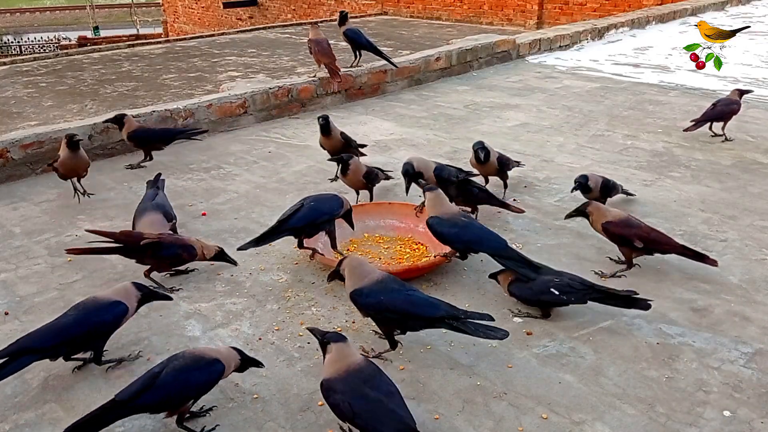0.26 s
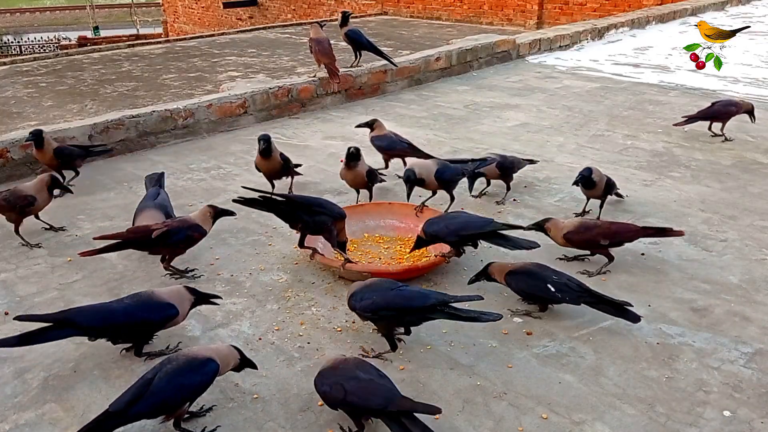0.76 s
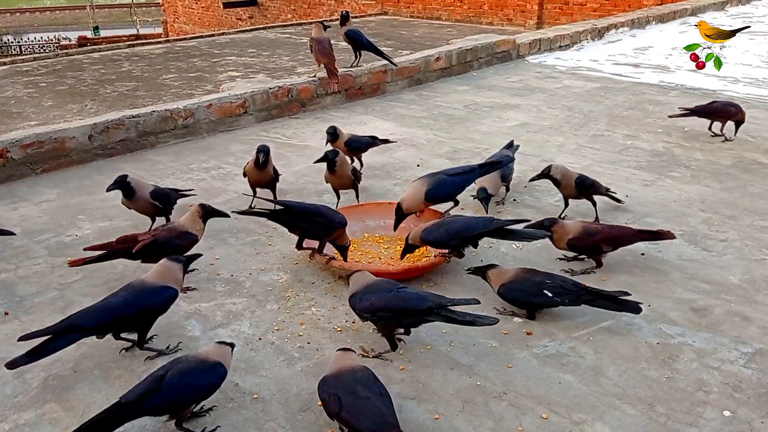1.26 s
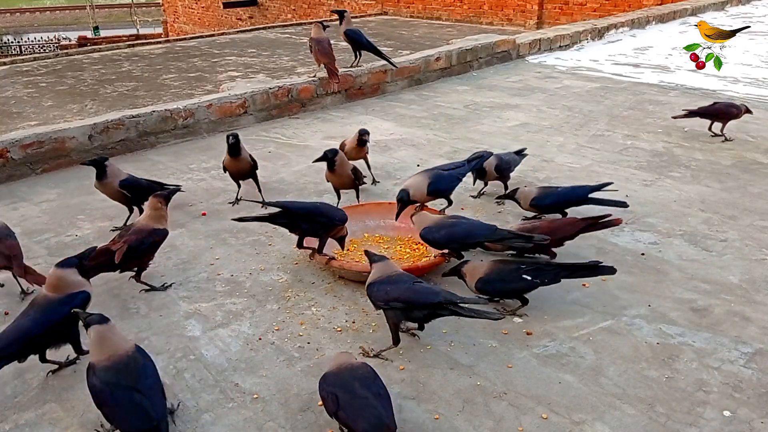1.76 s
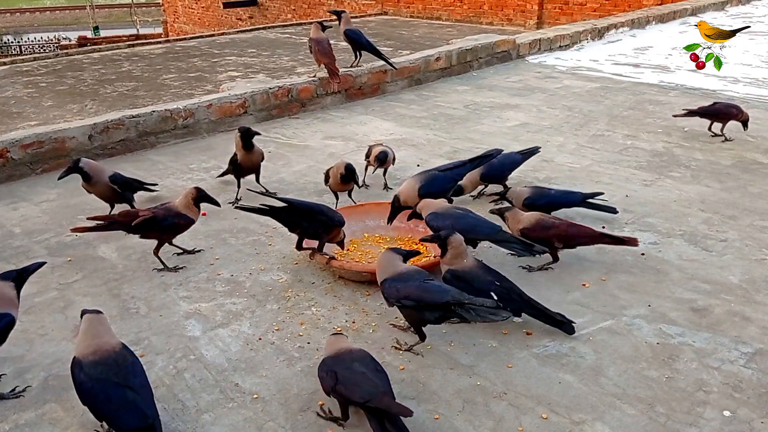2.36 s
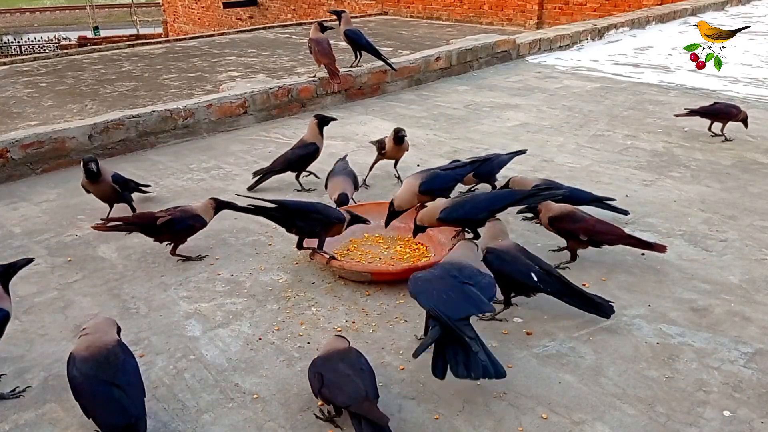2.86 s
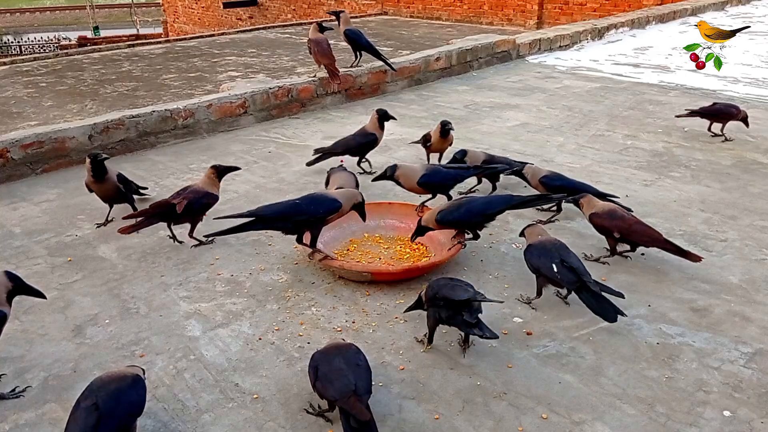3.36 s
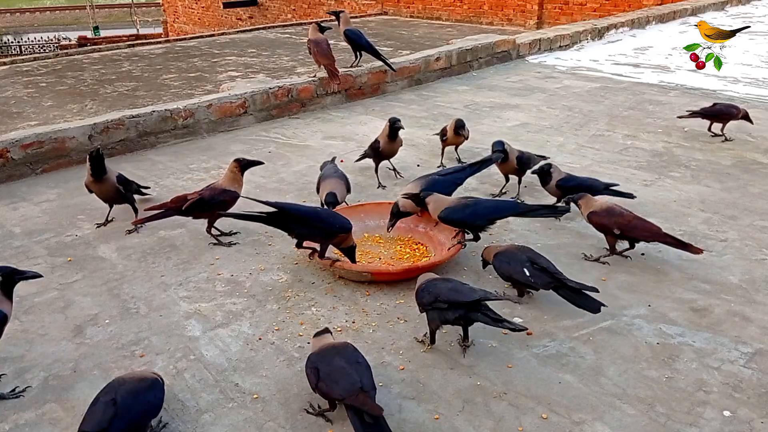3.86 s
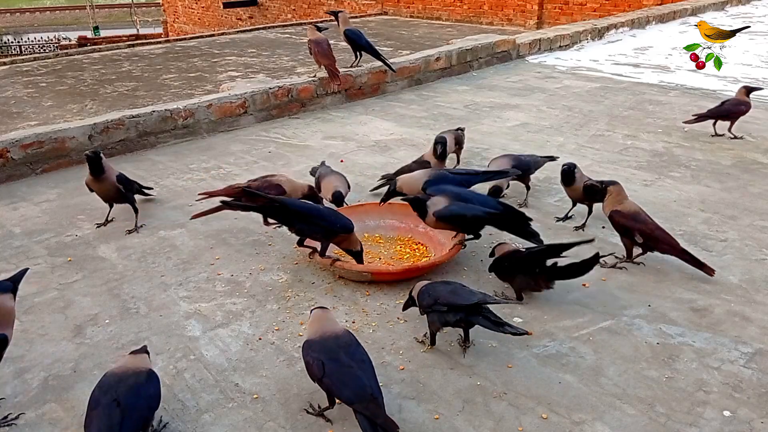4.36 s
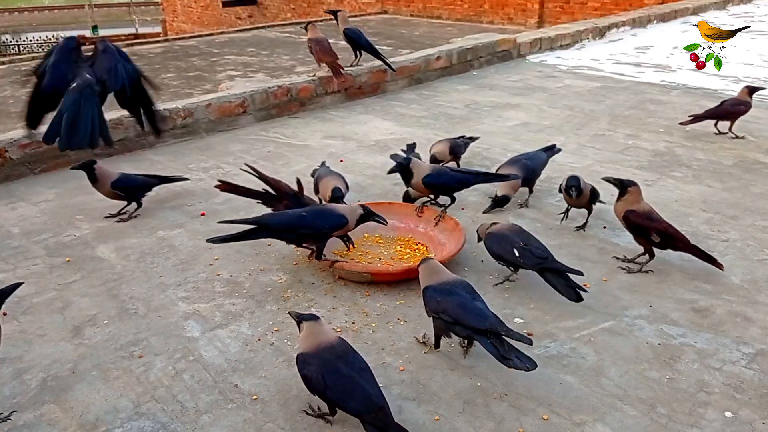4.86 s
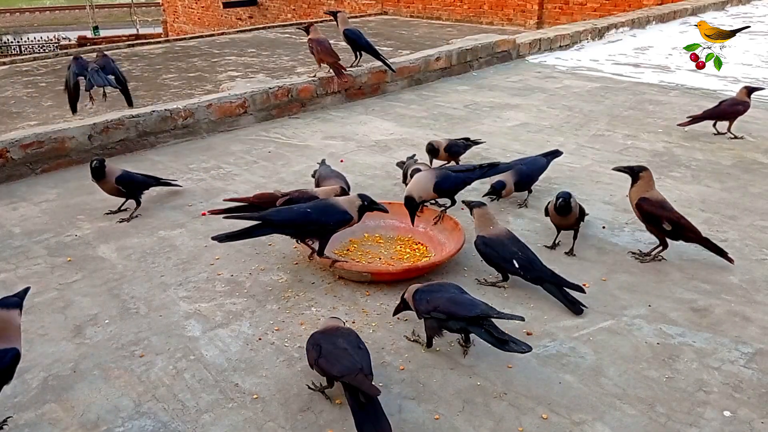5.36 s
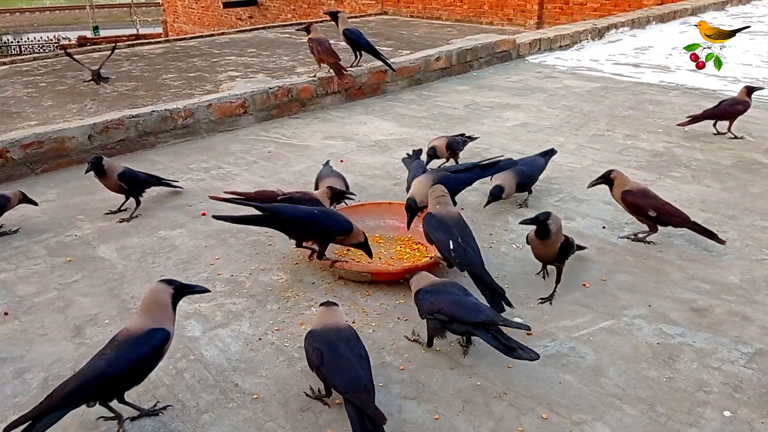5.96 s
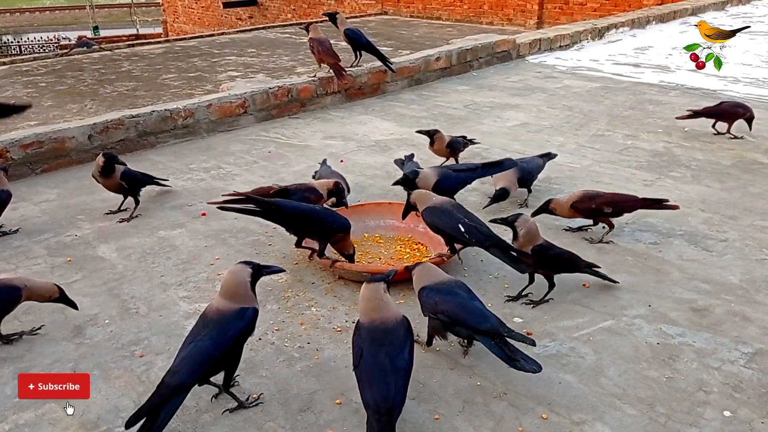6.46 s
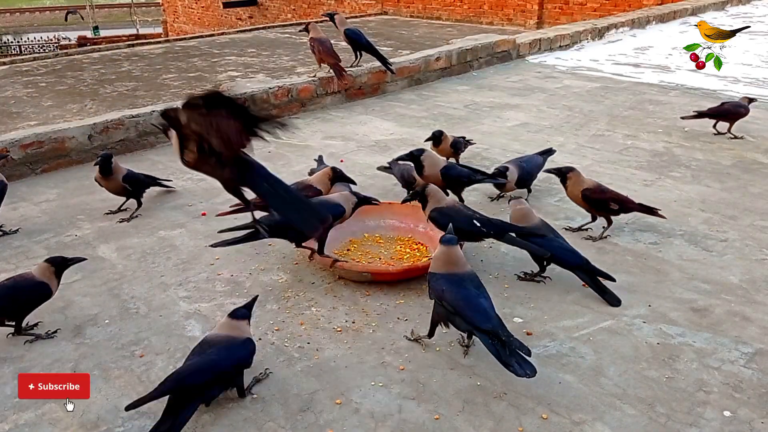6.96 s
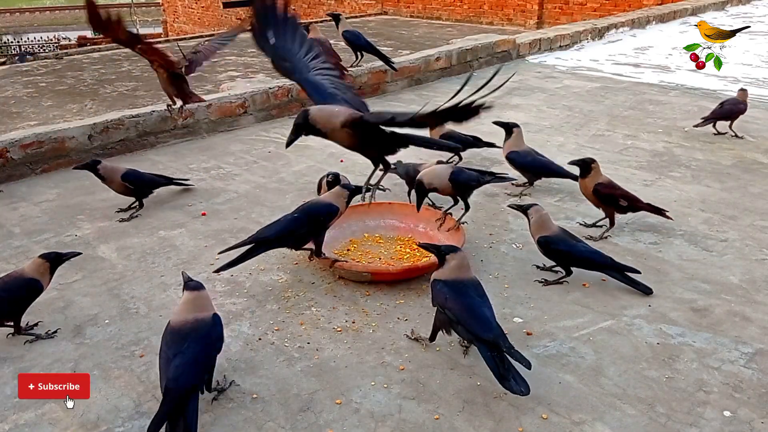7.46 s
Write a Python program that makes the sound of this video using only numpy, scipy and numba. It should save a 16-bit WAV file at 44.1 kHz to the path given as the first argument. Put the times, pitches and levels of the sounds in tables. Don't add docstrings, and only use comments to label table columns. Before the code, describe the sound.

A harsh caw opens, then pecks tick dryly on a bowl while tiny birds cheep far away. Further buzzing caws arch up and fall, loudest before the middle. Wings flap and feathers shuffle after that, with soft hollow gusts, then several more calls, some lower, one faint and rough. Heard outdoors from a few metres, with quick hard reflections and a quiet town rumble.

```python
import sys
import numpy as np
from scipy import signal
from scipy.fft import rfft, irfft, next_fast_len
from scipy.io import wavfile
from scipy.ndimage import uniform_filter1d
from numba import njit

SR = 44100
rng = np.random.default_rng(int(sys.argv[2]) if len(sys.argv) > 2 else 0)


def decibels_to_gain(level_db):
    exponent = np.asarray(level_db, float) / 20
    return 10 ** exponent


def int16_out(signal):
    q = np.round(np.clip(np.atleast_2d(signal).T, -1, 1) * 32767)
    wavfile.write(sys.argv[1], SR, q.astype(np.int16))


N = 340452
T = np.arange(N) / SR

# (centre [Hz], width [Hz], level [dB])
BEAK = [(4078.8, 520.1, 2), (5405.1, 1172.1, -5.5), (7002.4, 1348.3, -5.5)]


def level(x, db):
    return x * decibels_to_gain(db) / np.sqrt(np.mean(x ** 2) + 1e-30)


def band(x, hz, width):
    b, a = signal.iirpeak(hz, hz / width, fs=SR)
    return signal.lfilter(b, a, signal.lfilter(b, a, x))


def walk(rate, n=N):
    hold = max(int(SR / rate), 9)
    steps = rng.standard_normal(n // 8)[np.arange(n) // hold]
    return 1.6677 * uniform_filter1d(uniform_filter1d(steps, hold), hold)


def coloured(spectrum, swell_db, flicker_db, rate):
    hz, db = np.transpose(spectrum)
    size = next_fast_len(N)
    f = np.fft.rfftfreq(size, 1 / SR) + 1
    shaped = rfft(rng.standard_normal(size)) * decibels_to_gain(np.interp(np.log(f), np.log(hz), db))
    place = np.log2(f / 20) * 3 / 2
    swell = walk(rate / 8)
    out = np.zeros(N)
    for k in range(16):
        share = np.sqrt(np.clip(1 - abs(place - k), 0, 1))
        noise = irfft(shaped * share, size)[:N]
        out += noise * decibels_to_gain(swell_db * swell + flicker_db * walk(rate))
    return out


def narrow(hz, width_hz):
    k = int(SR / width_hz)
    a, b = uniform_filter1d(uniform_filter1d(rng.standard_normal((2, N)), k), k)
    phase = 2 * np.pi * np.cumsum(hz + 0 * T) / SR
    return level(a * np.cos(phase) + b * np.sin(phase), 0)


def swells(rows):
    s, db, rise, fall = np.array(rows).T[:4, :, None]
    away = np.where(T < s, (s - T) / rise, (T - s) / fall)
    return decibels_to_gain(db - 20 * away ** 1.3472)


def add(out, s, x):
    i = int(s * SR)
    out[i:i + len(x)] += x[:N - i]


def town():
    # (frequency [Hz], level per Hz [dB])
    rumble_spectrum = [(15, -48), (25, -37.5), (76, 6), (238, -4), (347, -8.5), (481, -10.5), (598, -7.5),
                       (1030, -21), (1630, -15), (5840, -35), (8530, -45), (15100, -53.5), (16400, -62)]
    # (centre [Hz], width [Hz], level [dB])
    hum_tones = [(73.718, 6, -68), (340.86, 31.87, -63)]
    # (peak time [s], peak level [dB], rise [s], fall [s])
    hoot_times = [
        (.28, -57, 0.0513, 0.2474),
        (.738, -57, 0.1017, 0.179),
        (1.176, -66.5, 0.0416, 0.173),
        (1.85, -61.5, 0.0489, 0.0438),
        (2.378, -59.5, 0.5184, 0.05073),
    ]
    rumble = level(coloured(rumble_spectrum, swell_db=.8, flicker_db=2, rate=8), -58)
    hum = sum(level(narrow(hz, width), db) for hz, width, db in hum_tones)
    hoot = narrow(637, width_hz=34.09) * swells(hoot_times).max(axis=0)
    return rumble + hum + hoot


def cheeps():
    # (start [s], length [s], from pitch [Hz], to pitch [Hz], level [dB])
    whistles = [
        (.625, .075, 4250, 4150, -66),
        (1.235, .04, 5050, 5000, -65),
        (2.215, .03, 6800, 5600, -61),
        (2.245, .035, 6600, 5200, -62),
        (.53, .06, 5500, 6100, -70),
        (1.355, .05, 3050, 3050, -68),
    ]
    out = np.zeros(N)
    for s, length, from_hz, to_hz, db in whistles:
        u = T[:int(length * SR)] / length
        phase = 2 * np.pi * np.cumsum(from_hz + (to_hz - from_hz) * u) / SR
        strength = decibels_to_gain(db + 4.26 * walk(185.35, len(u))) * np.sin(np.pi * u)
        add(out, s, strength * np.sin(phase))
    return out


def gusts():
    # (peak time [s], peak level [dB], rise [s], fall [s], pitch [Hz])
    puffs = [(0.062, -55, .04, .6, 390), (1.4, -57, 1.5, 0.05407, 345.7), (1.61, -53.5, .05, .12, 352),
             (2.99, -61.5, .4, 0.44894, 388.4), (3.501, -52.5, .15, 0.13964, 360.3),
             (3.7, -46.5, .09, 0.29879, 388.9), (3.91, -43.5, .14, 0.05986, 411),
             (4.07, -41, .08, 0.1131, 404), (4.3, -49.5, .18, 0.06178, 411), (4.58, -46.5, .3, 0.67, 390),
             (4.97, -42, .17, 0.04695, 387), (5.121, -37.5, .07, 0.045337, 347),
             (5.48, -49.5, 1.1, 0.07178, 371.3), (5.75, -60.5, .2, 2.5284, 355.9),
             (6.318, -42.5, .15, .08, 434.2), (6.9, -50.5, .6, 0.11416, 370),
             (6.99, -43.5, .08, 0.20459, 333.3), (7.2, -45, .09, 0.14, 453.9),
             (7.449, -52, .6, 0.2398, 360), (7.549, -43.5, .14, 0.062853, 416), (7.72, -55.5, .2, .2, 359)]
    gains = swells(puffs)
    hz = np.array(puffs)[gains.argmax(axis=0), -1]
    return narrow(hz, width_hz=196.64) * gains.max(axis=0)


def feathers():
    # (peak time [s], peak level [dB], rise [s], fall [s])
    shuffles = [(.29, -63.5, 0.0467, 0.2302), (.88, -70.5, 0.8656, 0.1358), (1.11, -59.5, 0.0509, 0.01581),
                (1.5, -66.5, 0.3308, 0.1004), (1.84, -71.5, 0.0978, 1.065), (2.186, -72, .6, 0.1776),
                (2.582, -69.5, 0.2095, 0.527), (3.5, -64, 0.1515, 0.221), (3.84, -61.5, 0.0403, 0.958),
                (4.464, -52, 0.16009, 0.8753), (5.18, -53.5, 0.7485, .45), (6.33, -62.5, 0.484, 1.2255),
                (6.92, -56.5, .23, 0.8666), (7.3, -55, 0.4016, 0.2952)]
    # (peak time [s], peak level [dB], rise [s], fall [s])
    swishes = [(3.93, -74.5, 0.02255, 0.030502), (3.97, -77.5, 0.01334, 0.0302),
               (4.38, -70.5, 0.02026, 0.029), (4.45, -69.5, 0.02725, 0.0496), (4.6, -67.5, 0.0401, 0.0298),
               (4.69, -66, 0.0229, 0.03023), (4.9, -71, 0.0301, 0.0877), (5.1, -62.5, 0.0373, 0.07634),
               (5.25, -61.5, 0.0547, 0.06026), (5.42, -74.5, .04, 0.035), (6.89, -66.5, 0.02314, 0.0595),
               (7.02, -63, 0.026, 0.057), (7.18, -72, 0.02923, 0.04173), (7.33, -75, 0.030846, 0.02276)]
    # (frequency [Hz], level per Hz [dB])
    feather_spectrum = [(710, -0.5), (1200, -3), (1510, -8.5), (2980, -7), (6300, -1), (8000, -19.5),
                        (13200, -24), (16000, -24)]
    rustle = level(coloured(feather_spectrum, swell_db=2.5, flicker_db=3.5, rate=180), 1.0753)
    air = level(band(rng.standard_normal(N) * decibels_to_gain(3 * walk(300)), 10500, 9000), 0)
    return rustle * swells(shuffles).max(axis=0) + air * swells(swishes).max(axis=0)


def wingbeats():
    # (start [s], peak level [dB], thump pitch [Hz], scuff [dB], length [s])
    flaps = [(2.165, -65.5, 228.7, 11, 0.02265), (3.892, -61, 149.9, 12.5, 0.01903),
             (4.448, -62.5, 208.9, 1, 0.02695), (4.564, -37.5, 232, -5, 0.016255),
             (4.588, -42.5, 202.6, -24, 0.00959), (4.724, -56.5, 288.6, 13, 0.00995),
             (4.882, -50.5, 229.4, 3, 0.02935), (4.946, -60.5, 262.8, -2, 0.02),
             (5.041, -43.5, 228.8, -3, 0.02298), (5.091, -51.5, 238.2, 5, 0.02281),
             (5.203, -48.5, 147, -9.5, 0.00847), (5.275, -48, 296.5, -2.5, 0.00786),
             (5.415, -51, 298.7, -1.5, 0.016085), (6.876, -49.5, 321.6, 1.5, 0.01895),
             (6.984, -31.5, 198.5, 0, 0.01039), (7.128, -51, 207.4, 3, 0.02932),
             (7.469, -45.5, 247.8, -11.5, 0.02071)]
    out, t = np.zeros(N), T[:5000]
    for s, db, hz, scuff_db, length in flaps:
        puff = t / length * np.exp(1 - t / length) * decibels_to_gain(db)
        thump = 2.7585 * np.exp(-t / length) * np.sin(2 * np.pi * hz * t)
        scuff = level(band(rng.standard_normal(len(t)), 500, 1700), 0)
        add(out, s, puff * (thump + decibels_to_gain(scuff_db - 4) * scuff))
    return out


def bowl_knock(tick):
    # (centre before scaling [Hz], width [Hz], level [dB])
    bowl = [(1466, 1571, 4.5), (2507.1, 1313.4, 10.5), (4024.8, 540, 1.5)]
    size = 0.92966
    return sum((-1) ** k * decibels_to_gain(db) * band(tick, hz * size, width) for k, (hz, width, db) in enumerate(bowl))


def pecks():
    # (time [s], peak level [dB], ring [Hz], low knock [dB], 60 dB decay [s])
    beak_ticks = [(0.3074, -41.5, 4880, 3.5, 0.0645), (0.4565, -71, 4550, -17, 0.0459),
                  (0.4969, -51, 5327, -10, 0.04925), (0.515, -41.5, 5949, -41.5, 0.03396),
                  (.851, -32.5, 5917, -7.5, 0.03177), (1.0154, -50.5, 3106, -24, 0.0604),
                  (1.3551, -53, 3036, 10, 0.03975), (1.4871, -48, 6437, -3.5, 0.0528),
                  (1.8536, -40.5, 6304, -19, 0.04917), (1.9142, -48, 5191, -21, 0.0792),
                  (2.0448, -36.5, 5627, -8.5, 0.1226), (2.3328, -40, 6514, -12, 0.0355),
                  (2.5457, -48.5, 6286, -6, 0.0405), (2.579, -46, 6365, -10.5, 0.1784),
                  (2.8714, -26.5, 5588, 8, 0.03584), (4.5354, -34.5, 6230, -25.5, 0.03005),
                  (5.9534, -34.5, 6805, -38, 0.03734), (5.9885, -39.5, 5490, -9.5, 0.0354),
                  (6.4103, -35.5, 3973, 6, 0.0375), (6.7213, -45, 5100, -12, 0.03285)]
    # (time [s], peak level [dB], ring [Hz], low knock [dB], 60 dB decay [s])
    snaps = [
        (1.115, -28, 6024, -6, 0.01653),
        (2.2137, -35.5, 5760, -10, 0.03512),
        (2.2752, -42.5, 4036, -24, 0.03418),
        (2.9963, -30, 5082, -0.5, 0.0886),
        (3.137, -46.5, 3134, -18.5, 0.0372),
        (3.3241, -58, 5489, 10, 0.06225),
        (3.8454, -27.5, 6198, -7.5, 0.014),
        (6.0668, -56, 3760, -17.5, .014),
        (6.8773, -43, 6315, -6, 0.0634),
    ]
    hits = sorted([(*r, -15) for r in beak_ticks] + [(*r, -7) for r in snaps])
    out, t = np.zeros(N), T[:6000]
    dull = signal.butter(8, 7200, fs=SR, output="sos")
    for s, db, hz, knock_db, decay_s, crack_db in hits:
        bounce_db = 4 * walk(400, len(t))
        skitter = rng.standard_normal(len(t)) * decibels_to_gain(bounce_db - 60 * t / decay_s)
        tick = (t < 1 / SR) + .05 * skitter
        ring = signal.sosfilt(dull, band(tick, hz, 2800))
        crack = band(tick, 13500, 9000)
        for x, part_db in (ring, 0), (bowl_knock(tick), knock_db), (crack, crack_db):
            add(out, s, decibels_to_gain(db + part_db) * x / abs(x).max())
    return out


@njit
def glide(x, hz, width):
    y, b, low = np.empty(len(x)), 0., 0.
    for i in range(len(x)):
        g, k = np.tan(np.pi * hz[i] / SR), width / hz[i]
        v = (b + g * (x[i] - low)) / (1 + g * (g + k))
        b, low, y[i] = 2 * v - b, low + 2 * g * v, k * v
    return y


def gaping(x, table, size, gape, sag):
    slide = size * (1 - sag * np.clip((1 - gape) / 0.4618, 0, 1.5))
    out = np.zeros(len(x))
    for k, (hz, width, db) in enumerate(table):
        once = glide(x, hz * slide, 1. * width)
        out += (-1) ** k * decibels_to_gain(db) * glide(once, hz * slide, 1. * width)
    return out


def effort(t, length, top_hz, db, fade_db, top_s, drop, late, release, scoop):
    up = np.clip(1 - t / top_s, 0, 1)
    down = np.clip((t - top_s) / (length - top_s), 0, 1)
    hz = top_hz * (1 - scoop * up ** 2.6 - drop * down ** late)
    swell = -17 * np.clip(1 - t / 0.040366, 0, 1)
    dying = -18.5 * np.clip(1 - (length - t) / release, 0, 1)
    return hz, db + swell + fade_db * t / length + dying


def caw(call, arch, voice, beak, rough, flutter_hz, swing, depth, size, edge_db):
    # (centre [Hz], width [Hz], level [dB])
    throat_modes = [(672.8, 923.6, -16), (1760.8, 688.21, -0.5), (2000.4, 534.28, 3),
                    (2625.1, 1010.9, -20.5)]
    # (centre [Hz], width [Hz], level [dB])
    edge_modes = [(8901.3, 1015.7, 9), (11044, 2100, -9.5), (14800, 2000, -4.5)]
    second_db, rasp_db, odd_db, scoop = voice
    t = T[:int(call[0] * SR)]
    n = len(t)
    hz, db = effort(t, *call, *arch, scoop)
    gape = hz / hz.max()
    second_db = second_db + 7 * 2 * (1 - gape)

    flutter = 2 * np.pi * np.cumsum(flutter_hz * (1 + .1 * rough * walk(60, n))) / SR
    wobble = swing * np.sin(flutter) + .05 * rough * walk(250, n)
    phase = 2 * np.pi * np.cumsum(hz * (1 + wobble)) / SR
    throb = depth * np.sin(flutter - 1.2)
    push = (1 + 0.59 * throb) * decibels_to_gain(rough * walk(150, n))

    k = np.arange(3, 36)[:, None]
    strength = np.where((k % 2 == 1) & (k < 8), decibels_to_gain(odd_db), 1)
    buzz = np.sum(np.cos(k * phase) * strength, axis=0)
    hiss = rng.standard_normal(n) * (1 + np.cos(phase))
    second = level((1 + throb) * decibels_to_gain(1.8 * rough * walk(120, n)) * np.cos(2 * phase), 0)
    throat = level(gaping(push * (buzz + 4.3 * rough * hiss), throat_modes, size, gape, sag=0.15385), 0)

    breathy = push * (buzz + (.4 + 2.5 * rough) * hiss)
    own_beak = [(f, width + 350, d) for f, width, d in beak]
    common = gaping(breathy, BEAK, 1.0096, gape, sag=0.066)
    own = gaping(breathy, own_beak, 1.0279, gape, sag=0.13015)
    rasp = level(common + own, 0)
    crackle = decibels_to_gain(2.1 * walk(40, n))
    edge = level(gaping(breathy, edge_modes, 1.0219, gape, sag=0.1) * crackle, edge_db)
    onset = np.minimum(np.minimum(t / 0.013494, (t[-1] - t) / 0.01412), 1)
    return onset * decibels_to_gain(db) * (throat + decibels_to_gain(second_db) * second + decibels_to_gain(rasp_db) * rasp + edge)


def far_crows():
    # (start [s], length [s], top pitch [Hz], level [dB], fade over the call [dB])
    far_caws = [
        (3.47, 0.09025, 485.7, -68.5, 34),
        (4.35, 0.1897, 479.5, -62, -1),
        (5.88, 0.17515, 483, -44.5, -23.5),
        (7.26, 0.18703, 495.6, -52, -5),
    ]
    # (flutter rate [Hz], pitch swing [share], flutter depth [0-1], throat size [factor], sharp top [dB])
    far_bird = (78, .06, .4, .98, -42)
    # (top pitch after [s], pitch lost by the end [share], lateness of the fall [power], release [s])
    far_arch = (.04, .03, 2.2, 0.03471)
    # (second harmonic [dB], rasp [dB], odd harmonics [dB], pitch starts low by [share])
    far_voice = (-11.5, -14.5, 5, 0.7792)
    out = np.zeros(N)
    for s, *call in far_caws:
        add(out, s, caw(call, far_arch, far_voice, BEAK, .7, *far_bird))
    return out


def near_crows():
    # (start [s], length [s], top pitch [Hz], level [dB], fade over the call [dB])
    caws = [
        (.012, 0.25655, 498.2, -25, -11),
        (1.525, 0.30545, 493.4, -24, -8),
        (2.803, 0.25975, 483.4, -26, -10.5),
        (3.548, 0.28184, 520, -21.5, -15),
        (4.012, 0.32357, 546.3, -23.5, -3),
        (5.574, 0.31893, 558.5, -27.5, -4.5),
        (6.071, 0.24633, 441.5, -25, -1.5),
        (6.433, 0.31858, 464.8, -40, -5.5),
        (6.986, 0.29698, 544.8, -31, -1),
    ]
    # (flutter rate [Hz], pitch swing [share], flutter depth [0-1], throat size [factor], sharp top [dB])
    birds = [(83.249, 0.07138, 1, 0.9864, -31.5), (76.16, 0.10345, 0.86, 0.95584, -29.5),
             (75.481, 0.08771, 0.92, 0.98515, -31), (75.631, 0.08166, 1, 1.0419, -26),
             (80.377, 0.062756, 0.51, 0.9755, -33), (80.814, 0.05716, 0.52, 1.0216, -59),
             (79.83, 0.06533, 0.24, 0.88213, -35), (63.733, 0.063, 0.8, 0.97348, -32),
             (84.127, 0.08218, 0.14, 0.93944, -46.5)]
    # (top pitch after [s], pitch lost by the end [share], lateness of the fall [power], release [s])
    arches = [(.1, .42, 2.4, 0.037), (.07, .36, 2.4, 0.08051), (.07, .27, 2.1, 0.04319),
              (.075, 0.49, 1.5, 0.05509), (.08, .46, 3.6, 0.06849), (.1, 0.21, 1.8, 0.06262),
              (0.083, .19, 3, 0.030994), (0.15, 0.42, 1.6, 0.1029), (.08, .32, 2.1, 0.07717)]
    # (second harmonic [dB], rasp [dB], odd harmonics [dB], pitch starts low by [share])
    voices = [(-7.5, -10.5, 1, .25), (-10.5, -12.5, 1, .28), (-9.5, -11.5, 1, .25), (-9.5, -11.5, 1, .3),
              (-9.5, -13, -8, .42), (-17, -14.5, -8.5, 0.33), (-15, -18.5, -1, .25), (-10, -9.5, 4, .22),
              (-12.5, -16, 1, .25)]
    # (centre [Hz], width [Hz], level [dB])
    beaks = [
        [(4477.7, 38.4, -4.5), (5256.6, 53, 0), (6353, 51.4, -0.5)],
        [(4104, 53, -9.5), (5438.4, 233.4, -10), (6539.6, 72, -9)],
        [(3632, 163.3, -7), (5274, 113.2, 0), (6444.7, 31, -3.5)],
        [(3967, 39, -27), (5201, 45, -17.5), (6745.2, 103.4, -3)],
        [(4371.9, 37, 1.5), (5854.6, 60, -12), (6188.4, 78.4, 0)],
        [(4201.5, 49, 13.5), (5086.2, 55, 9), (6304.1, 64, 2.5)],
        [(3832.5, 82, 4.5), (5439.6, 43, -13), (6450.4, 270, -0.5)],
        [(3760, 39, 10.5), (5755.7, 110, 8.5), (6056, 80, -21.5)],
        [(4020, 38, -2), (4427.2, 59, 0.5), (6027, 61, -1)],
    ]
    roughness = [.24, .3, .28, .26, .12, .1, .07, .6, .18]
    out = np.zeros(N)
    for (s, *call), arch, voice, beak, rough, bird in zip(caws, arches, voices, beaks, roughness, birds):
        add(out, s, caw(call, arch, voice, beak, rough, *bird))
    return out


def roof(x):
    t = T[:SR]
    near = rng.standard_normal(SR) ** 3 * (t > .002) * decibels_to_gain(-60 * t / 0.06855)
    far = band_once(rng.standard_normal(SR), 1200, 4500) * (t > .03) * decibels_to_gain(-60 * t / 0.406)
    echoes = level(near, -1) + level(far, -23)
    return x + signal.fftconvolve(x, echoes / np.sqrt(SR))[:N]


def band_once(x, hz, width):
    return signal.lfilter(*signal.iirpeak(hz, hz / width, fs=SR), x)


def scene():
    echoing = roof(near_crows() + far_crows() + pecks() + cheeps())
    return (echoing + wingbeats() + gusts() + feathers() + town())[None]


def low_pass(x):
    return signal.sosfilt(signal.butter(12, 16510, fs=SR, output="sos"), x)


def record(dry):
    port = dry + 1.4 * band(dry, 15200, 1300)
    cut = signal.ellip(8, .3, 70, 16250, fs=SR, output="sos")
    return low_pass(signal.sosfilt(cut, port))


dry = scene()
out = record(dry)
int16_out(out)
```